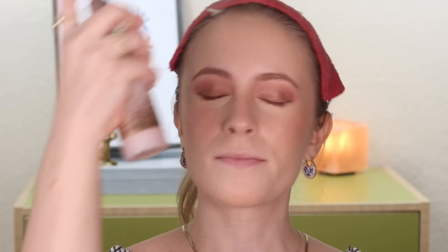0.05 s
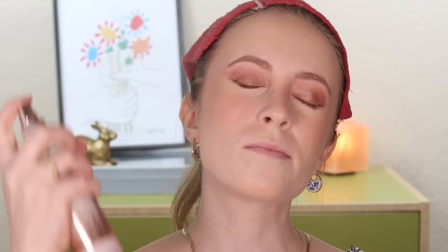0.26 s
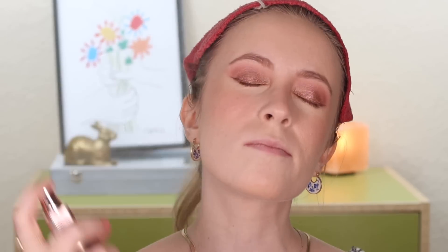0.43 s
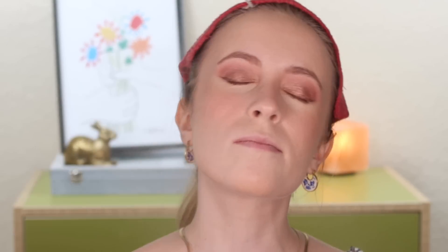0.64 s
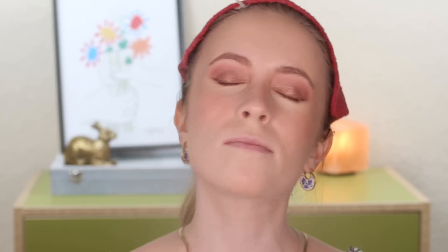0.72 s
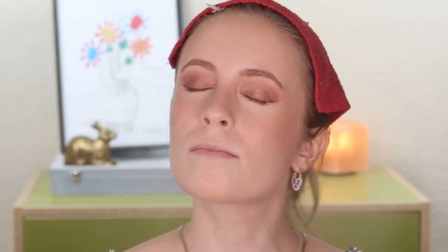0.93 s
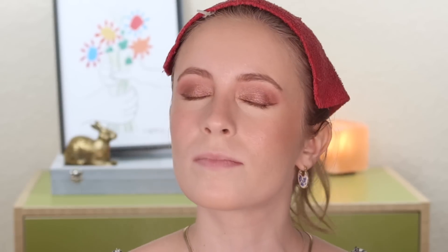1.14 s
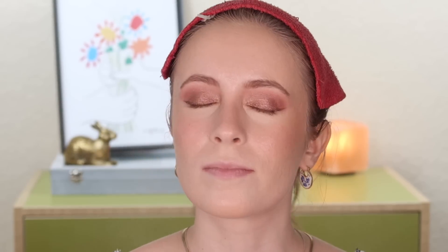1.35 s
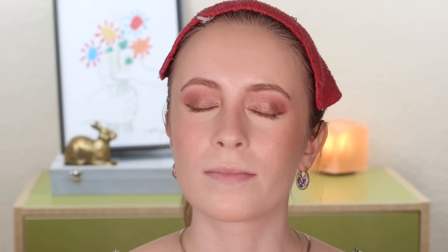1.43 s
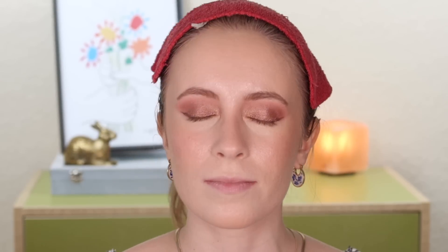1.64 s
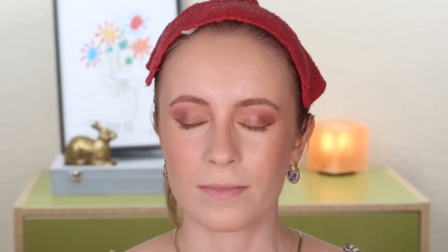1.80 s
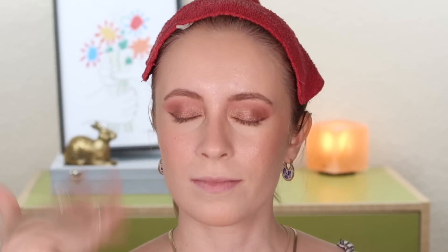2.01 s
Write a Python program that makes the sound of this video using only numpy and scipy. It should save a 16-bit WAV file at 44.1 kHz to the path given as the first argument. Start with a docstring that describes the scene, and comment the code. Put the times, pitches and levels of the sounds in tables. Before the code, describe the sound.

Five quick hissing spritzes from a pump spray bottle, close up in a quiet room

```python
"""Five short hisses of mist, close by in a small quiet room: a pump bottle is pressed, sputtering noise in bands.
Between them the plastic pump ticks (snaps through resonances) and plips wetly as it refills (short sines).
Later a hand moves, rustles (dense crackles) and something small clatters (more snaps).
A low room hum with wavering tones and a faint hiss (coloured noise) lie under all."""
import sys
import numpy as np
from scipy import signal
from scipy.fft import rfft, irfft, next_fast_len
from scipy.io import wavfile

SR = 44100
rng = np.random.default_rng(int(sys.argv[2]) if len(sys.argv) > 2 else 0)


def waveform_to_disk(signal):
    """Save audio, clipped to [-1, 1], as 16-bit WAV at the path in sys.argv[1]."""
    frames = np.transpose(np.atleast_2d(signal))
    scaled = np.clip(frames, -1, 1) * 32767
    samples = np.round(scaled).astype(np.int16)
    wavfile.write(sys.argv[1], SR, samples)


N = 90934
RISE_EXPONENT = 2.1   # of every swell


def amp(db):
    """Gain from dB."""
    return 10 ** (np.asarray(db) / 20)


def rms_one(x):
    """Scale to rms 1."""
    return x / np.sqrt(np.mean(x ** 2) + 1e-20)


def clock():
    """Sample times [s]."""
    return np.arange(0, N / SR - .5 / SR, 1 / SR, dtype=np.float32)


def in_time(rows):
    """Level curve through (time [s], level [dB]) rows."""
    return np.interp(clock(), *np.transpose(rows))


def at_hz(points, hz):
    """Interpolate a (frequency [Hz], value) table over log frequency."""
    point_hz, values = np.transpose(points)
    return np.interp(np.log(hz), np.log(point_hz), values)


def drift(rate_hz):
    """Random curve of rms 1: noise through two equal one-pole lowpasses."""
    pole = np.exp(-2 * np.pi * rate_hz / SR)
    settle = 8000   # samples dropped
    noise = rng.standard_normal(N + settle)
    return rms_one(signal.lfilter([1], [1, -2 * pole, pole * pole], noise)[settle:])


def colour(x, spectrum):
    """Shape by a spectrum table, silent outside it; rms 1."""
    hz = np.maximum(np.arange(N // 2 + 1) * SR / N, 1)
    inside = (hz > spectrum[0][0]) & (hz < spectrum[-1][0])
    return rms_one(irfft(rfft(x) * amp(at_hz(spectrum, hz)) * inside, N))


def swell(start_s, rise_s, hold_s, fall_s, fall_db):
    """Gain that rises by a power law, holds, then changes by fall_db every fall_s."""
    t = clock() - start_s
    rising = np.clip(t / max(rise_s, 1e-4), 0, 1) ** RISE_EXPONENT
    falling_s = np.clip(t - rise_s - hold_s, 0, 1)
    return rising * amp(fall_db * falling_s / max(fall_s, 1e-4))


# presses: (start [s], rise [s], hold [s], level [dB], change over the hold [dB], shut [s],
#           body offset at low bands [dB], treble offset at high bands [dB])
PRESSES = [(0.017, 0.0031, 0.056, -37.5, -5, 0.035, 2, 0), (0.234, 0.004, 0.061, -35, -2, 0.024, 0.5, -2.5),
           (0.455, 0.0072, 0.067, -32.5, -7, 0.016, 6, 0.5), (0.696, 0.019, 0.044, -35.5, -8, 0.021, 9, 5),
           (0.927, 0.024, 0.034, -31.5, -8, 0.017, 4.5, 1)]
# mist spectrum: (frequency [Hz], relative density [dB per Hz])
MIST_SPECTRUM = [(410, -35), (700, -30.5), (1180, -24), (1660, -8.5), (2700, -1.5), (3460, -1),
                 (4150, -1.5), (5920, -7), (8760, -5), (10400, -13), (14000, -14), (16000, -22.5)]
# late filling of the bands: (frequency [Hz], lag [s])
BAND_LAG = [(1000, 0.047), (2000, 0.062), (3500, 0.00026), (9000, 0.021), (14000, 0.018)]
# tone of the leak: (frequency [Hz], level [dB])
LEAK_TREBLE = [(9000, 2), (11000, -1.5), (16000, 2)]
LATE_DB = -8.5   # start of a lagging band, scaled by lag / (rise + lag)
SHUT_DB = -13.5   # valve closing, per shut time
LEAK_DB, LEAK_T60_S = -14, 0.4
LEAK_END_S, LEAK_STOP_S = 0.064, 0.081   # end after the hold; time per further 20 dB
SPUTTER_DB, SPUTTER_HZ = 1.5, 530


def spray():
    """Jet hiss in bands: each follows the press with its own lag, all sputter together, a leak follows."""
    jet = colour(rng.standard_normal(N), MIST_SPECTRUM) * amp(SPUTTER_DB * drift(SPUTTER_HZ))
    jet_bins, bin_hz = rfft(jet), np.arange(N // 2 + 1) * SR / N
    centres_hz = np.geomspace(600, 16000, 15)
    t, out = clock(), 0
    for k, hz in enumerate(centres_hz):
        # triangular bands over log frequency
        weight = np.interp(np.log(bin_hz + 1), np.log(centres_hz), np.arange(len(centres_hz)) == k)
        band = irfft(jet_bins * weight, N)
        lag_s = max(at_hz(BAND_LAG, hz), 0)
        gain = 0
        for start, rise, hold, db, sag_db, shut, body_db, treble_db in PRESSES:
            level_db = db + at_hz([(1800, body_db), (3500, 0), (7000, treble_db)], hz)
            fill_s = rise + lag_s
            unfilled = np.clip(1 - (t - start) / fill_s, 0, 1)
            filling = amp(LATE_DB * unfilled * lag_s / fill_s)
            sag = amp(sag_db * np.clip((t - start - rise) / hold, 0, 1))
            valve_open = filling * swell(start, rise, hold, shut, SHUT_DB) * sag
            leak_decay = swell(start, rise + hold, 0, LEAK_T60_S, -60)
            leak_stop = swell(-1, 1, start + rise + hold + LEAK_END_S, LEAK_STOP_S, -20)
            leak = amp(at_hz(LEAK_TREBLE, hz)) * leak_decay * leak_stop
            gain = gain + amp(level_db) * (valve_open + amp(LEAK_DB + sag_db) * leak)
        out = out + band * gain
    return out


# pump ticks: (time [s], pitch of the variable ring [Hz], strength of each of the four rings [dB] x 4)
PUMP_TICKS = [(.1945, 4460, -62, -61, -62.5, -80), (.3905, 4740, -52, -48, -47, -64),
              (.3942, 4270, -47.5, -47, -46, -58), (.4188, 4750, -51, -38, -58, -71),
              (.4230, 4500, -55, -54, -48, -66), (.4375, 4200, -49, -49, -43.5, -62),
              (.4437, 4300, -43.5, -53, -39.5, -42.5), (.5778, 4500, -48, -61, -46.5, -67),
              (.6556, 4360, -59, -41, -60, -75), (.8172, 4500, -63, -74, -44.5, -60),
              (.8786, 3640, -55.5, -46.5, -63, -73), (.8794, 4770, -72, -39, -58, -69),
              (.8835, 4250, -64, -53, -54.5, -78), (1.047, 4500, -66, -74, -57, -75)]
# clatter in the hand: (time [s], pitch of the variable ring [Hz], strength of each ring [dB] x 4)
HAND_CLATTER = [(1.7355, 3000, -58, -73, -63, -67), (1.7650, 3120, -53.5, -47, -59, -60),
                (1.7733, 3320, -46, -43.5, -55, -60), (1.7783, 3520, -50, -52, -66, -68),
                (1.7812, 3500, -64, -57, -59, -73), (1.8114, 3500, -69, -47.5, -36.5, -50),
                (1.8180, 3660, -61, -48.5, -51, -64), (1.8724, 3640, -43.5, -38.5, -40, -61),
                (1.8860, 3560, -55, -44, -65, -76), (1.8932, 3900, -65, -52, -48, -78)]
PUMP_RESONANCES = [(2230, 1040, 0.017), (None, 800, 0.008), (7660, 3500, 0.012), (13100, 3000, 0.0049)]
CLATTER_RESONANCES = [(None, 1330, 0.013), (5040, 1800, 0.0093), (8240, 1720, 0.01), (12600, 1000, 0.0062)]
PUMP_BOUNCE_S, CLATTER_BOUNCE_S, BOUNCE_DB = .00142, .00112, -6   # off a nearby surface
SCRATCH_DB = -25   # rough tail, against the first snap
KNOCK_SAMPLES = 1024


def knocks(events, resonances, bounce_s, order):
    """Snap, quick bounce and rough tail of each contact, through four broad resonances of the plastic."""
    out, t = np.zeros(N + KNOCK_SAMPLES), np.arange(KNOCK_SAMPLES) / SR
    bounce = np.arange(KNOCK_SAMPLES) == int(bounce_s * SR)
    snap = (t == 0) + amp(BOUNCE_DB) * bounce
    noise = rng.standard_normal((len(events), len(resonances), KNOCK_SAMPLES))
    signs = (-1) ** np.arange(len(resonances))
    for (start, pitch_hz, *strengths_db), noises in zip(events, noise):
        at = int(start * SR)
        for (hz, width_hz, t60_s), db, rough, sign in zip(resonances, strengths_db, noises, signs):
            hz = hz or pitch_hz
            edges_hz = [hz - width_hz / 2, hz + width_hz / 2]
            sos = signal.butter(order, edges_hz, "band", fs=SR, output="sos")
            scratch = amp(SCRATCH_DB) * rough * amp(-60 * t / t60_s)
            hit = signal.sosfilt(sos, snap + scratch)
            # strength: rms as if spread over 40 samples
            out[at:at + KNOCK_SAMPLES] += sign * amp(db) * hit / np.sqrt(np.sum(hit ** 2) / 40)
    return out[:N]


ROOM_T60_S, ROOM_DB, WALL_CUT_HZ = 0.12, -21.5, 8400


def room(x):
    """Small-room echo: ten feedback delays of alternating sign, dulled by a one-pole lowpass."""
    size = next_fast_len(N + SR // 2)
    hz = np.arange(size // 2 + 1) * SR / size
    dull, echo = 1 / (1 + 1j * hz / WALL_CUT_HZ), 0
    for k, lag_s in enumerate(np.geomspace(.0045, .021, 10)):
        loop = amp(-60 * lag_s / ROOM_T60_S) * np.exp(-2j * np.pi * hz * lag_s)
        echo = echo + (-1) ** k * loop / (1 - loop)
    return irfft(rfft(x, size) * echo * dull, size)[:N]


# wet plips: (time [s], level before rise and decay [dB], frequency [Hz])
REFILL_PLIPS = [(.579, -42, 1840), (0.795, -40, 1800), (0.817, -40.5, 1864), (1.047, -41, 1900)]
PLIP_RISE_S, PLIP_T60_S = 0.0011, 0.019   # rise is a time constant


def plips():
    """Wet plips as the pump refills: short soft decaying sines."""
    out = 0
    for start, db, hz in REFILL_PLIPS:
        t = np.clip(clock() - start, 0, 1)
        envelope = amp(db - 60 * t / PLIP_T60_S) * (1 - np.exp(-t / PLIP_RISE_S))
        out = out + envelope * np.sin(2 * np.pi * hz * t)
    return out


# rustles: (start [s], rise [s], hold [s], fall by 20 dB [s], level [dB], centre [Hz],
#           slope away from the centre [dB per octave])
RUSTLE_SWELLS = [(0.395, 0.0063, 0.0057, 0.047, -49.5, 5760, -7.5),
                 (0.424, 0.03, 0.023, .01, -61, 6250, -3), (1.551, .008, .01, 0.047, -77, 7260, -6),
                 (1.675, 0.018, 0.035, 0.15, -78, 8300, -41), (1.689, 0.024, 0.027, 0.055, -74.5, 4630, -7),
                 (1.755, 0.0087, 0.063, .04, -64.5, 4700, -8.5),
                 (1.866, 0.0061, 0.027, 0.028, -62, 5100, -11), (1.926, 0.06, .2, .05, -79, 2930, -60)]
CRACKLES_PER_S, CRACKLE_SPREAD_DB, RUSTLE_TOP_HZ = 11000, -1, 9900


def rustle():
    """Dense uneven crackles under a few swells, each around its own pitch, dull at the top."""
    present = rng.random(N) < CRACKLES_PER_S / SR
    strength = amp(CRACKLE_SPREAD_DB * rng.exponential(1, N))
    crackles = present * strength * rng.choice([-1, 1], N)
    crackles = signal.sosfilt(signal.butter(2, RUSTLE_TOP_HZ, fs=SR, output="sos"), crackles)
    out, octaves = 0, np.linspace(-3, 3, 25)
    for start, rise, hold, fall, db, hz, slope_db in RUSTLE_SWELLS:
        slope = np.maximum(slope_db * np.abs(octaves), -40)
        spectrum = np.transpose([hz * 2 ** octaves, slope])
        out = out + amp(db) * swell(start, rise, hold, fall, -20) * colour(crackles, spectrum)
    return out


# room hum: (time [s], level [dB])
HUM_LEVEL = [(1.05, -63.5), (1.3, -66.5), (1.63, -69.5), (1.9, -63.5), (2.06, -66)]
# hum spectrum: (frequency [Hz], relative density [dB per Hz])
HUM_SPECTRUM = [(30, -49), (55, -23), (76, -32), (101, -9.5), (153, -7), (231, -1.5), (284, 2), (384, -6.5),
                (615, -10.5), (729, -13.5), (1800, -31.5), (2340, -49)]
# faint wavering tones: (frequency [Hz], level against the hum [dB])
WAVERING_TONES = [(505, -17), (640, -17), (860, -17.5)]
# faint hiss: (time [s], level [dB])
HISS_LEVEL = [(0, -73), (.92, -72), (1.2, -73), (1.3, -77), (1.65, -79), (1.95, -74), (2.06, -75)]
# hiss spectrum: (frequency [Hz], relative density [dB per Hz])
HISS_SPECTRUM = [(710, -1), (1200, -2.5), (1890, -5.5), (3110, -6), (8260, -12), (11300, -17), (14000, -20),
                 (16000, -15)]
TONE_WIDTH_HZ = 12


def background():
    """Low room hum and faint hiss of coloured noise; wavering tones are noise through narrow peaks."""
    hum = colour(rng.standard_normal(N), HUM_SPECTRUM)
    white = rng.standard_normal(N)
    for hz, db in WAVERING_TONES:
        peak = signal.iirpeak(hz, hz / TONE_WIDTH_HZ, fs=SR)
        hum = hum + amp(db) * rms_one(signal.lfilter(*peak, white))
    hiss = colour(rng.standard_normal(N), HISS_SPECTRUM)
    return amp(in_time(HUM_LEVEL)) * hum + amp(in_time(HISS_LEVEL)) * hiss


def scene():
    """Sum of all sources, alike on both sides; only the knocks excite the room echo."""
    ticks = knocks(PUMP_TICKS, PUMP_RESONANCES, PUMP_BOUNCE_S, order=3)
    clatter = knocks(HAND_CLATTER, CLATTER_RESONANCES, CLATTER_BOUNCE_S, order=2)
    hits = ticks + clatter
    mid = spray() + hits + amp(ROOM_DB) * room(hits) + plips() + rustle() + background()
    return np.array([mid, mid])


STOPBAND_HZ = 16500


def record(dry):
    """Steep lowpass, 60 dB down from STOPBAND_HZ up."""
    return signal.sosfilt(signal.cheby2(16, 60, STOPBAND_HZ, fs=SR, output="sos"), dry)


dry = scene()
out = record(dry)
waveform_to_disk(out)
```